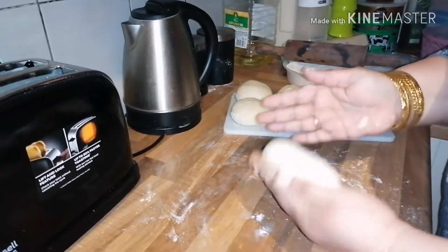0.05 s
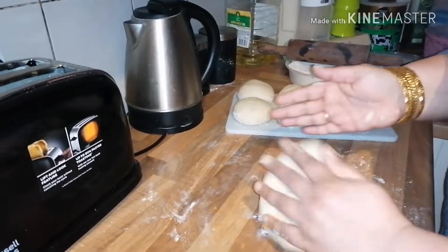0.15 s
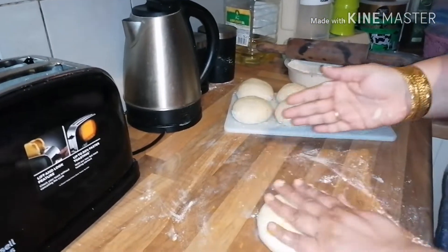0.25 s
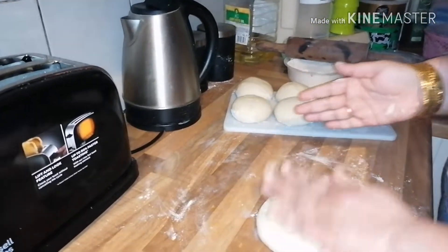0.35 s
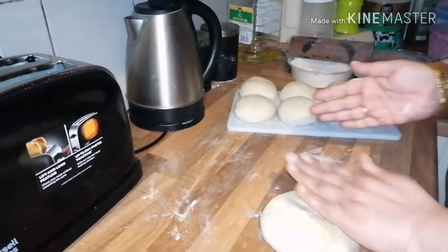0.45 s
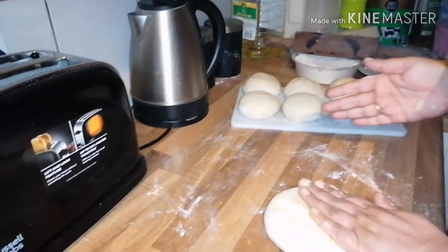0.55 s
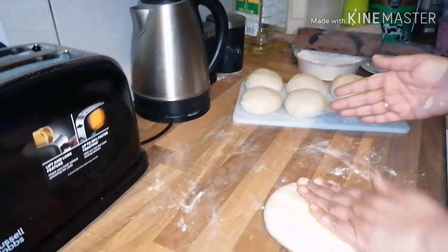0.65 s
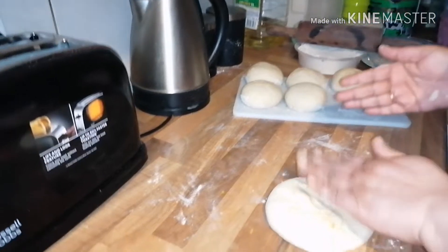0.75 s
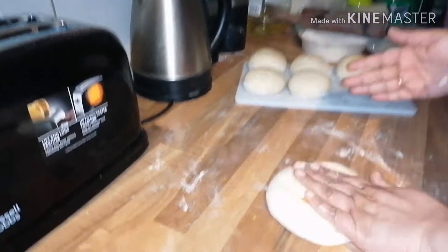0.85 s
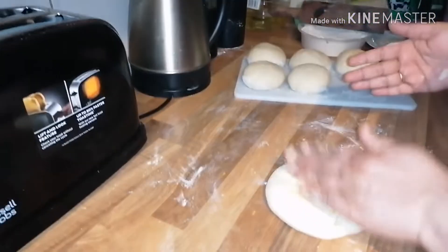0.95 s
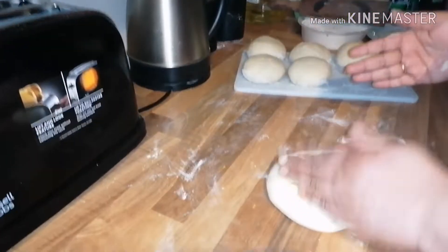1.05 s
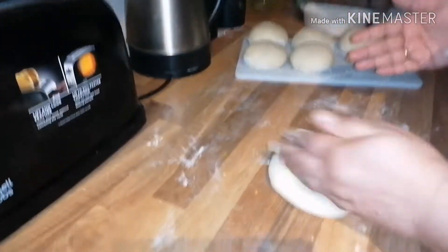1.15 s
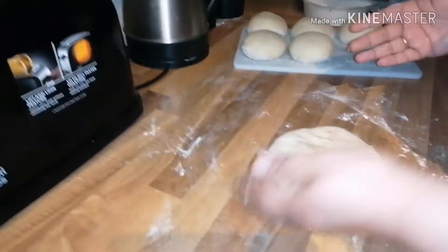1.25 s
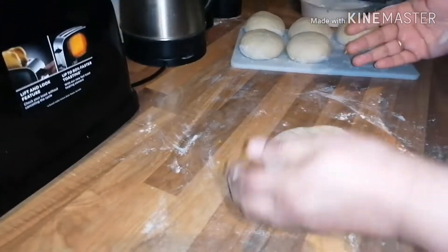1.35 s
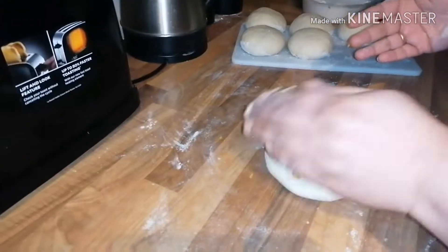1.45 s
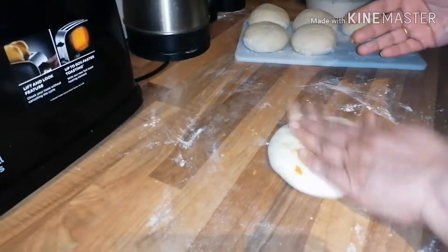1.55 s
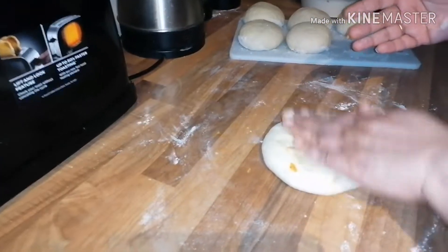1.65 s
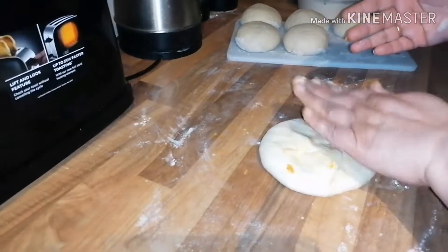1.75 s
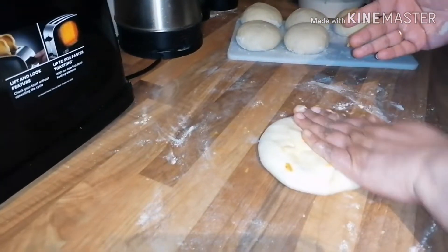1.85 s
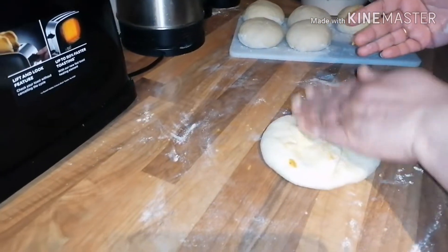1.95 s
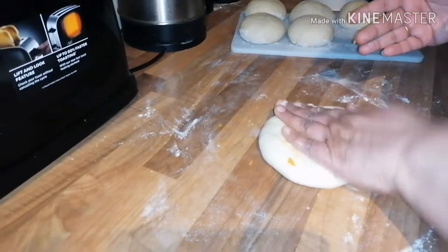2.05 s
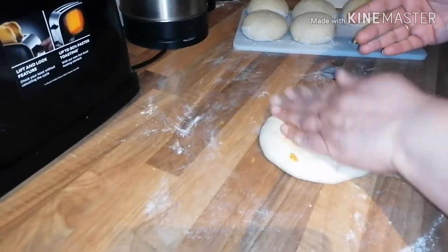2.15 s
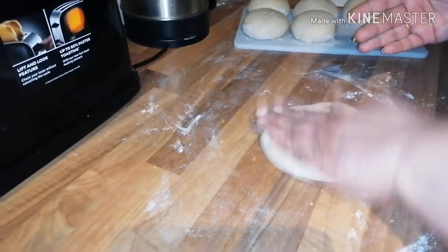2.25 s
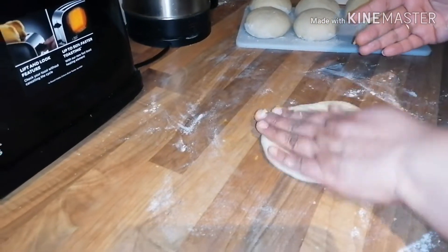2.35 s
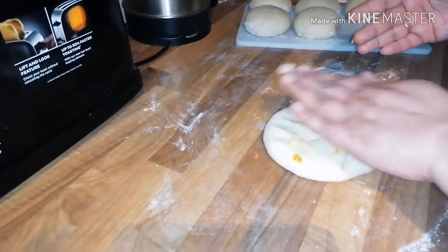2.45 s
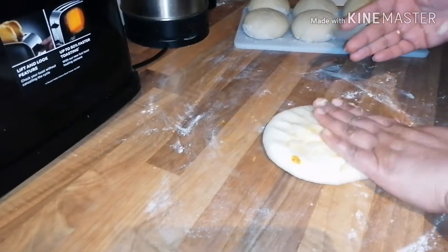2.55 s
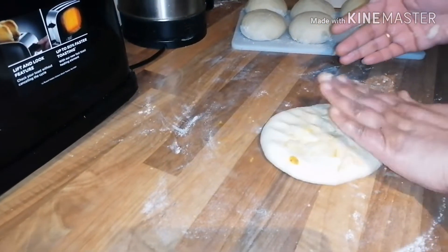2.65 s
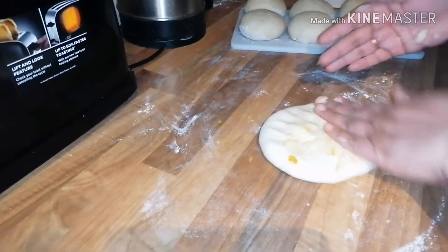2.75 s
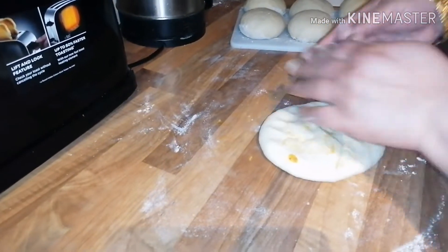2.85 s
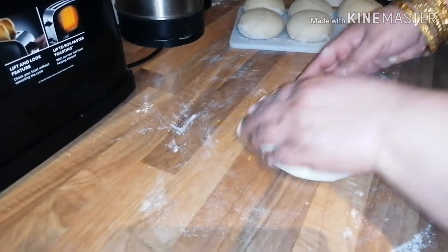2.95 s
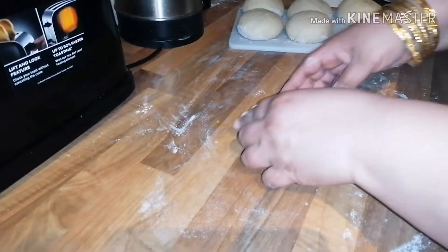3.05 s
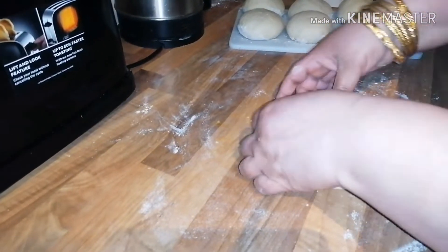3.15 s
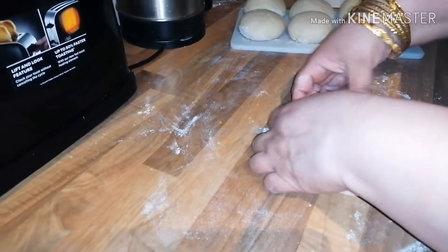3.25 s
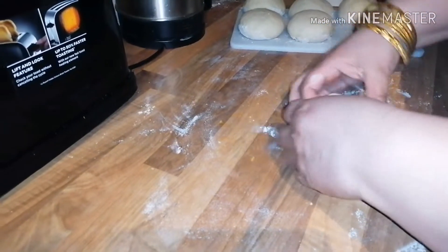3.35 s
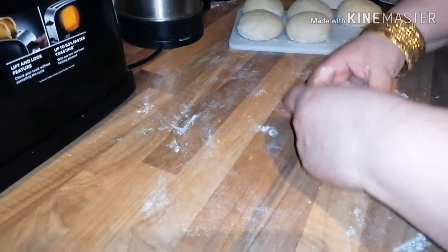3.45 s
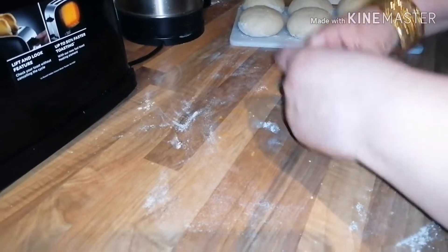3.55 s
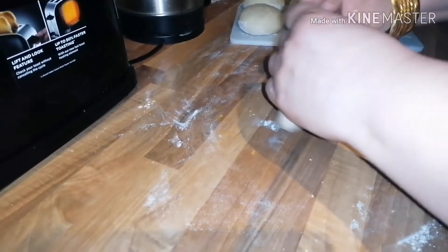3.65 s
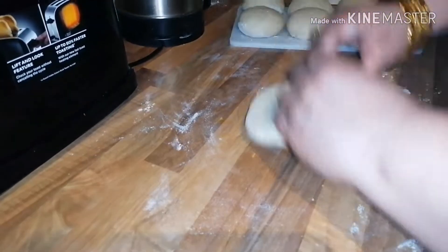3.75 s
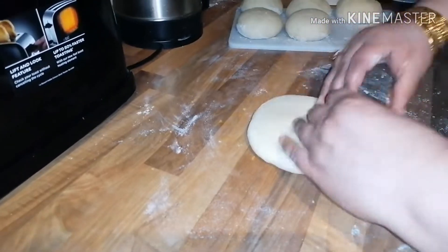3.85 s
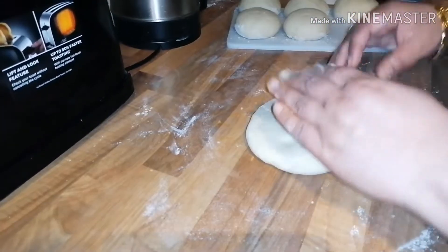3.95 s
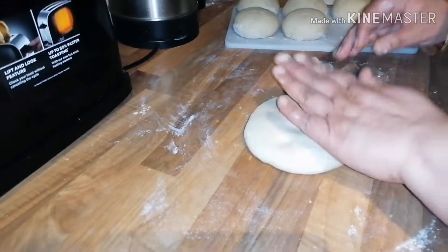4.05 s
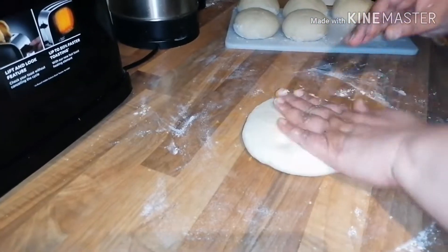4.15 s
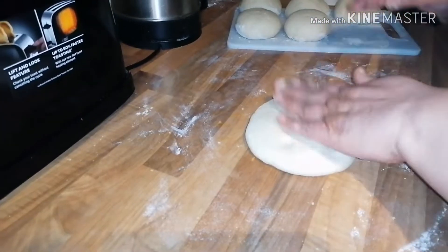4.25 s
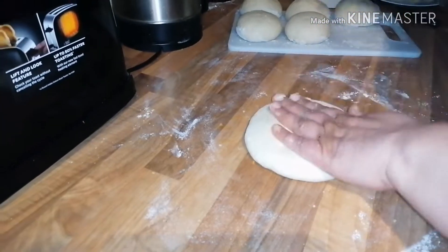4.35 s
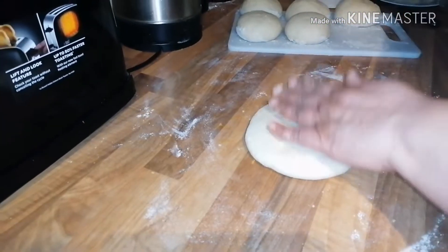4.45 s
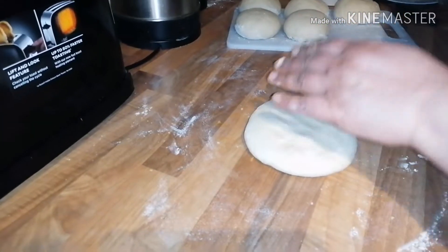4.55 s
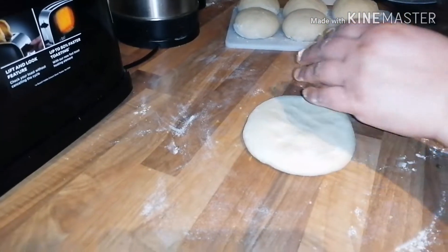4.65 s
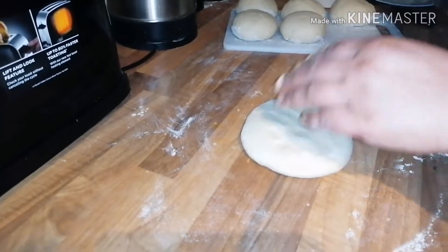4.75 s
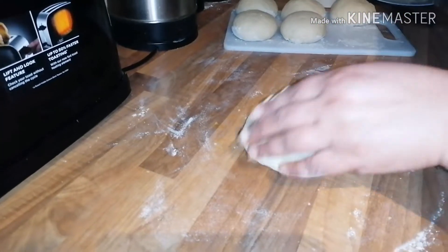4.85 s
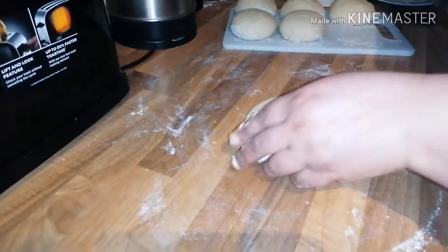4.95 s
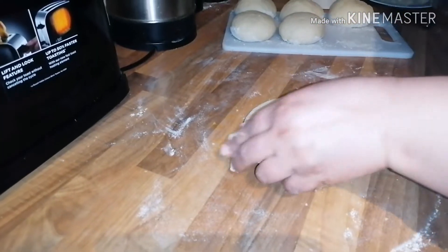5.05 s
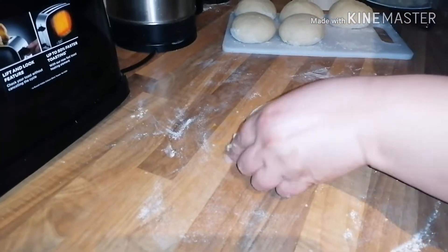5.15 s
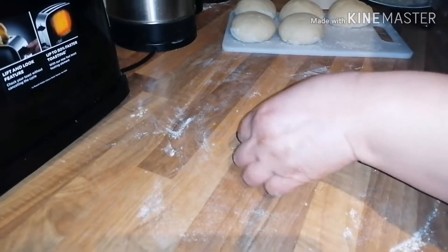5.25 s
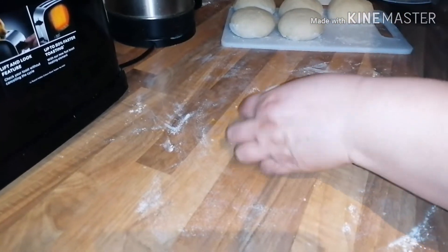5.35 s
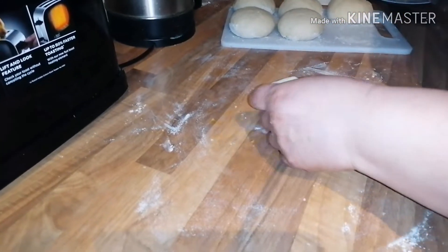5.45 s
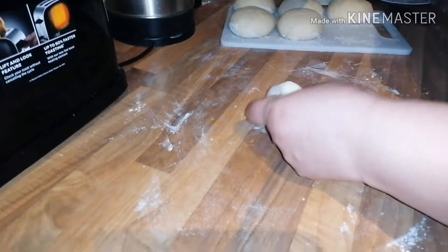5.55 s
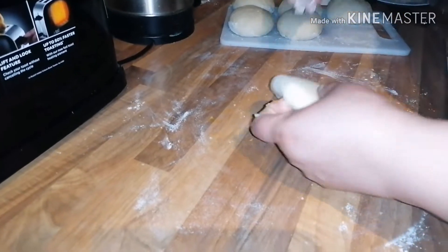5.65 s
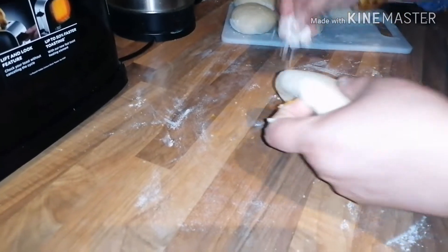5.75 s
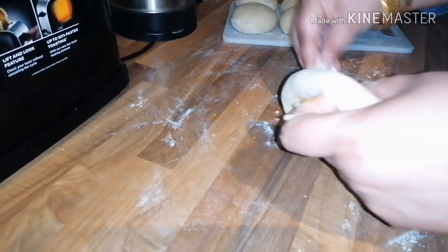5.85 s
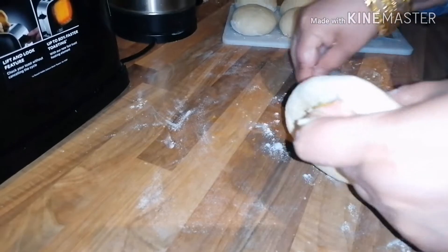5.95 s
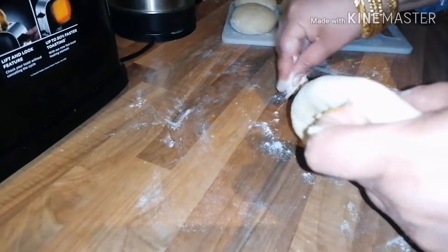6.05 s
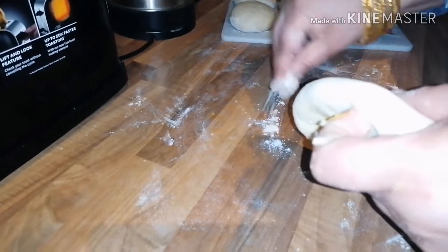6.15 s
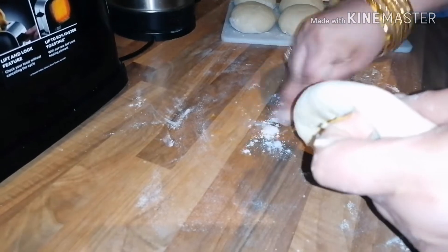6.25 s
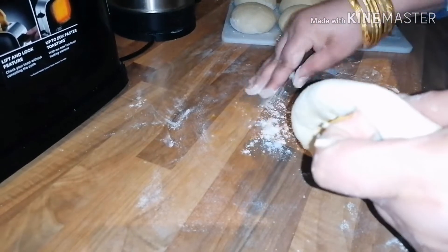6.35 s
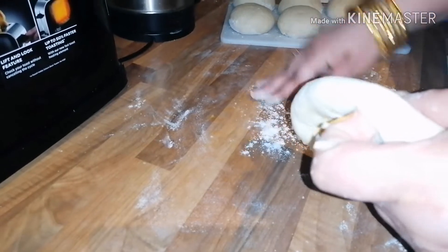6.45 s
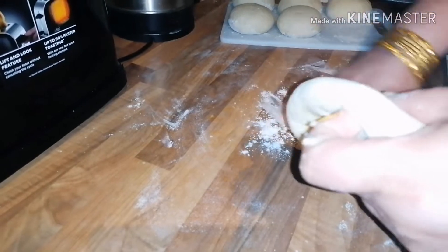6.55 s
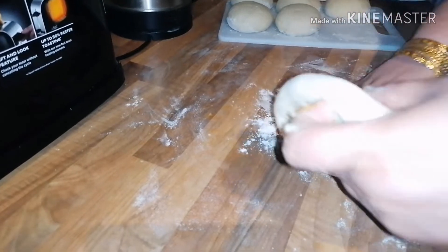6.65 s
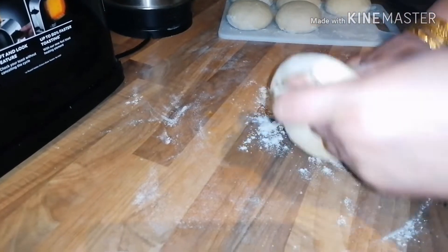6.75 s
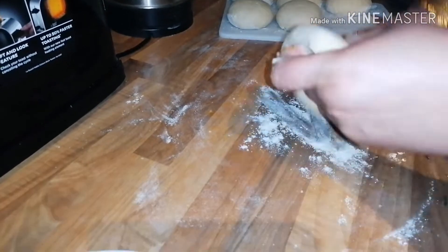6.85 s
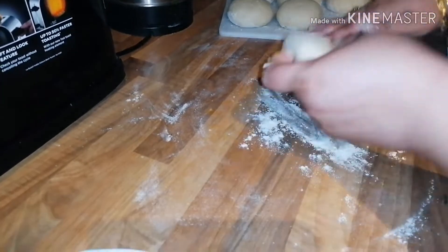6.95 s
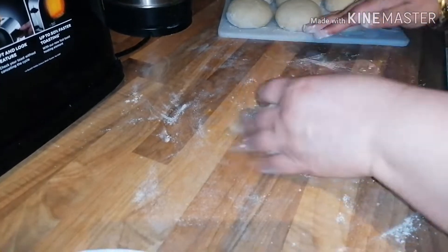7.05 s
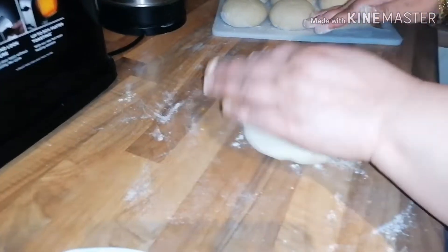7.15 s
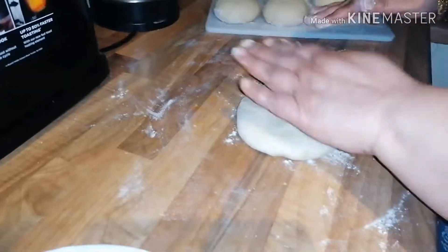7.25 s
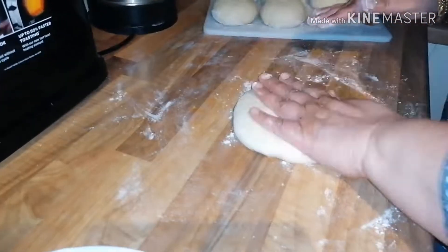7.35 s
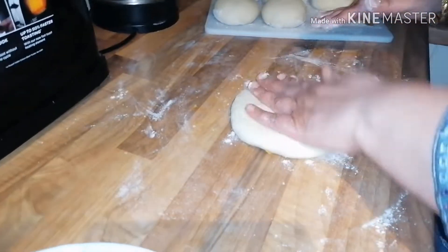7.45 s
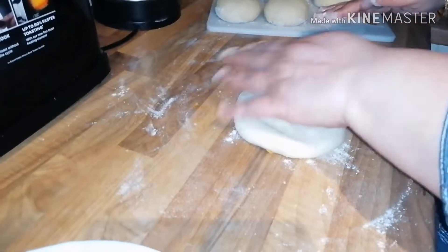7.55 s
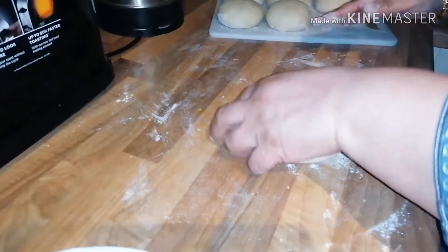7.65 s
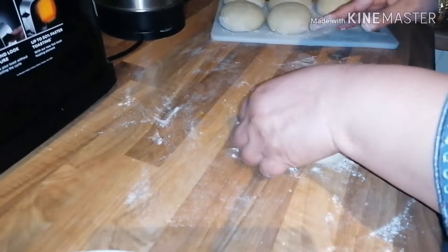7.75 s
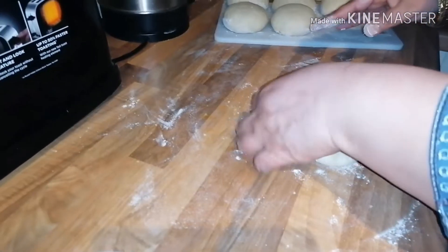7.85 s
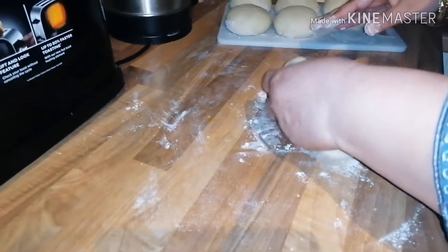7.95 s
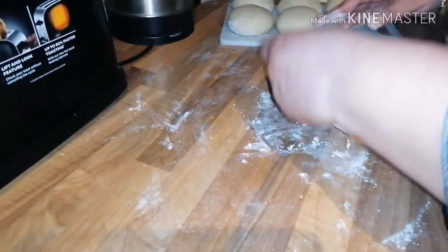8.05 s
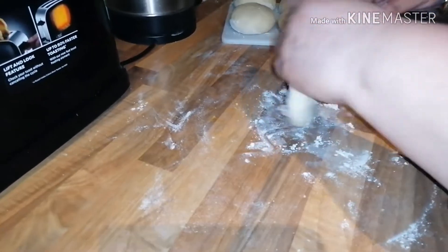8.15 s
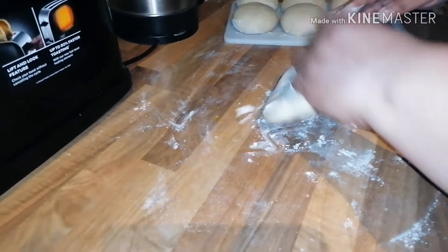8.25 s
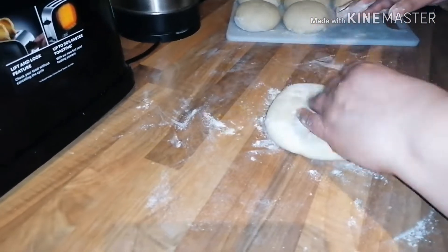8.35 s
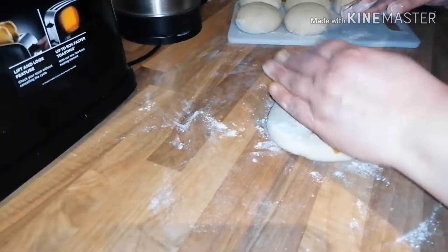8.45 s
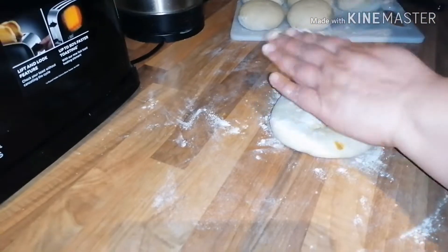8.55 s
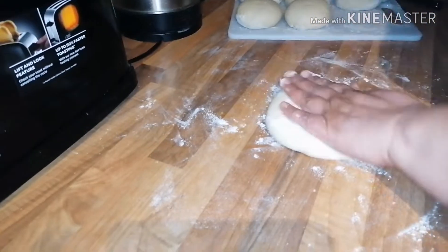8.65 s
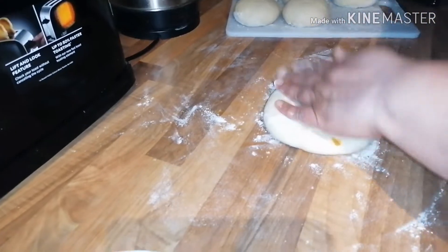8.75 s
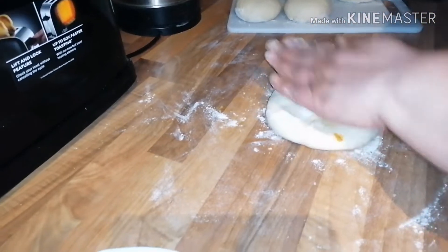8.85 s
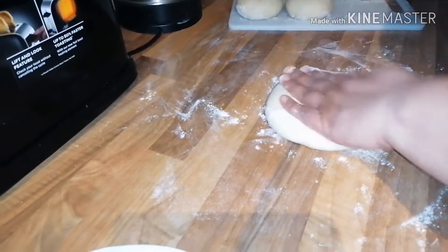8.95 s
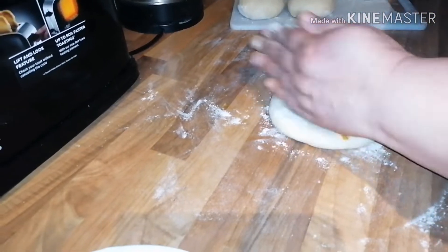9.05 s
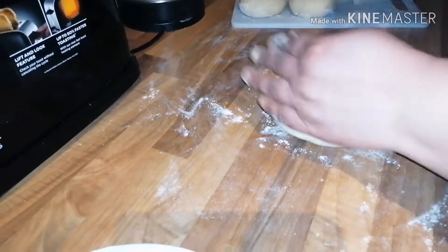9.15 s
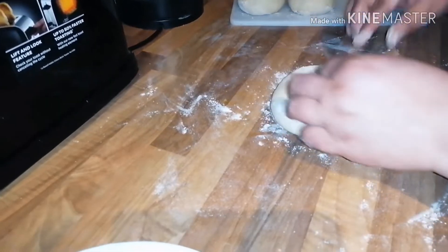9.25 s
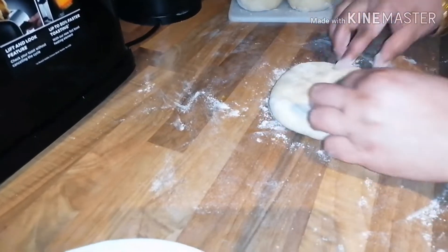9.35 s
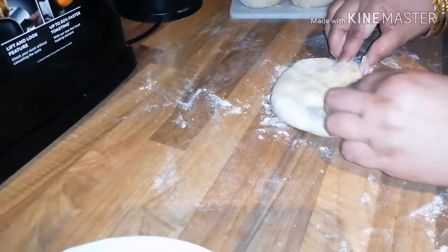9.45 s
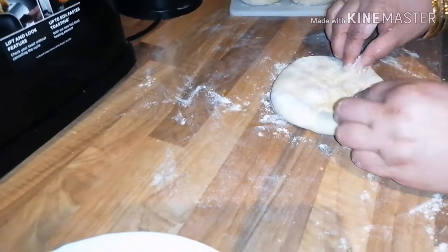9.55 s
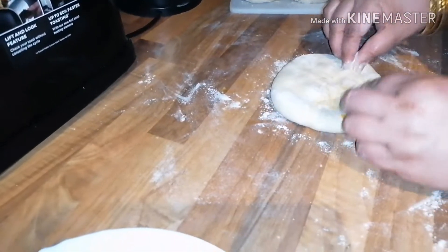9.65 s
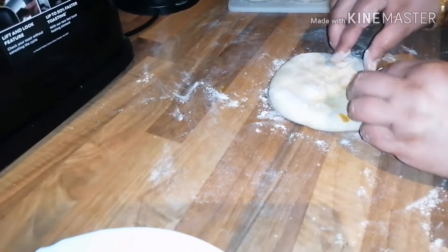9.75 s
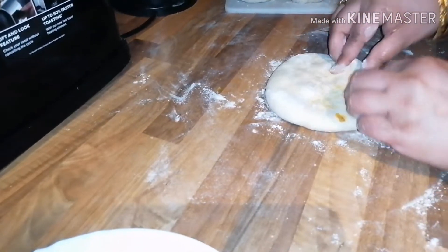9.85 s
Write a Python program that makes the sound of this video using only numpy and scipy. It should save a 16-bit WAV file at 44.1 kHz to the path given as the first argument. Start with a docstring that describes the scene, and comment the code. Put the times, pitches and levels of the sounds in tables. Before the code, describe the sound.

Close stereo sound in a small, quiet kitchen. A loud dough slap lands on a wooden worktop, followed by a run of softer pats. A pause brings floury sliding and a light bangle clink, then three more pats, quiet rubbing, another hard slap and a last group of firm pats.

```python
"""Hands on soft dough

A hand pats and presses soft dough on a wooden worktop in a small kitchen, heard from close by.
Each pat is a resonant pop of trapped air, a broadband smack of skin and a thud of decaying worktop modes.
Between pats, shaped noise makes fingers slide through flour, and thin bangles clink as decaying modes.
The hand holding the phone adds filtered rumble; noise with drifting patches is the kitchen air.
"""
import sys
import numpy as np
from scipy import signal
from scipy.fft import rfft, irfft
from scipy.io import wavfile
from scipy.ndimage import uniform_filter1d

SR = 44100
rng = np.random.default_rng(int(sys.argv[2]) if len(sys.argv) > 2 else 0)


def master_out(mix):
    """Clip the mix to full scale and print it as 16-bit PCM to the path in sys.argv[1]."""
    frames = np.transpose(np.atleast_2d(mix))
    ceiling = np.clip(frames, -1, 1)
    pcm = np.round(ceiling * 32767).astype(np.int16)
    wavfile.write(sys.argv[1], SR, pcm)


def boost_factor(decibels):
    """Convert a level in decibels to a linear amplitude factor."""
    exponent = np.asarray(decibels, float) / 20
    return 10 ** exponent


N = 436149  # length in samples


def evened(x):
    """Normalisation: scales a signal to rms 1."""
    return x / np.sqrt(np.mean(x ** 2) + 1e-20)


def read(points, hz):
    """Interpolation of a table on a logarithmic frequency axis."""
    f, value = np.transpose(points)
    return np.interp(np.log(hz + 1), np.log(f + 1), value)


def add(mix, s, sound):
    """Superposition: adds a sound to the mix from s seconds on."""
    part = mix[round(s * SR):][:len(sound)]
    part += sound[:len(part)]


def resonate(x, hz, width):
    """Resonance by heterodyning: shifts hz down to zero, smooths, and shifts back, with gain 1."""
    turn = np.exp(2j * np.pi * hz * np.arange(len(x)) / SR)
    r = np.exp(-np.pi * width / SR)
    smooth = signal.lfilter([1 - r], [1, -r], x / turn + 1e-18)
    return 2 * (turn * smooth).real


def coloured(x, spectrum):
    """Linear filtering in the frequency domain by a table of f/Hz, level/dB."""
    gain = boost_factor(read(spectrum, np.fft.rfftfreq(len(x), 1 / SR)))
    return irfft(rfft(x) * gain, len(x))


def ring(modes, scatter_db, rise_s, detune):
    """Modal synthesis: one blow excites damped sines, and chance varies each mode's share and pitch."""
    t = np.arange(SR // 3) / SR
    hz, db, t60 = np.transpose(modes)[:, :, None]
    share, shift = rng.standard_normal((2, *hz.shape))
    decay = boost_factor(db + scatter_db * share - 60 * t / t60)
    sines = np.sin(2 * np.pi * hz * (1 + detune * shift) * t)
    return (decay * sines).sum(0) * (1 - np.exp(-t / rise_s))


def correlated(left, other, same):
    """Interchannel coherence: mixes independent noises into a right channel of given likeness to the left."""
    return same * left + np.sqrt(1 - same ** 2) * other


def airy(spectrum, likeness, patchy_db):
    """Short-time spectral synthesis: two-channel noise of rms 1 with drifting patches in time and frequency."""
    hz = np.fft.rfftfreq(1024, 1 / SR)
    a, b, c, d, patches = rng.standard_normal((N // 256 + 5, 513, 5)).T
    patches = uniform_filter1d(patches, 12, axis=0)  # over frequency
    patches = evened(uniform_filter1d(patches, 10, axis=1))  # over time
    same = np.clip(read(likeness, hz), -1, 1)[:, None]
    left = a + 1j * b
    z = np.array([left, correlated(left, c + 1j * d, same)])
    z *= boost_factor(read(spectrum, hz)[:, None] + patchy_db * patches)
    return evened(signal.istft(z, nperseg=1024, noverlap=768)[1][:, :N])


# spectrum of the kitchen air: f/Hz, level/dB (relative density)
AIR_SPECTRUM = [(80, -18.5), (150, -12), (300, -11.5), (600, -12), (1300, -16.5), (2500, -20.5),
                (5000, -27), (9500, -32), (11500, -32.5), (13000, -39.5), (15500, -44.5)]
# left-right likeness of the kitchen air: f/Hz, correlation/1
AIR_LIKENESS = [(60, 1), (180, -2.9), (550, 0.11), (1650, -0.67), (4970, 0.3), (15000, -0.02)]


def kitchen_air():
    """Stationary diffuse noise: a quiet, patchy background of -70 dB rms."""
    return boost_factor(-70) * airy(AIR_SPECTRUM, AIR_LIKENESS, patchy_db=2.5)


# course of the deep handling rumble: t/s, level/dB (rms)
RUMBLE_COURSE = [(0, -68), (.8, -68), (0.961, -52), (1.15, -52.5), (1.32, -70.5), (2.3, -65.5),
                 (2.8, -73.5), (3.1, -63), (3.4, -68), (3.8, -73.5), (3.96, -61.5), (4.25, -60), (4.7, -67),
                 (5.4, -68), (5.75, -60.5), (5.95, -70), (7.2, -69.5), (7.502, -65), (8.799, -67),
                 (9.88, -70)]


def rumble():
    """Low-frequency excitation: the holding hand's deep noise, and worktop modes humming louder after a thud."""
    a, b, push = rng.standard_normal((3, N))
    grip = a + 0.35 * b, a - 0.35 * b  # left and right are alike but not equal
    depth = [(10, -6.5), (25, -6.5), (38, 7.5), (55, -11), (90, -30), (200, -66.5)]  # f/Hz, level/dB
    deep = evened(np.array([coloured(x, depth) for x in grip]))
    course = boost_factor(np.interp(np.arange(N) / SR, *np.transpose(RUMBLE_COURSE)))
    boom = evened(sum(boost_factor(db) * resonate(push, hz, 29) for hz, db, _ in WORKTOP_MODES[:3]))
    idle_db, shake_db = -72, -22  # steady hum; shake relative to the thud setting
    rise_s, t60_s = 0.05, 0.54
    t = np.arange(SR) / SR
    shake = np.full(N, boost_factor(idle_db))
    for s, _, thud_db, *_ in PAT_EVENTS + TOUCH_EVENTS:
        add(shake, s, boost_factor(thud_db + shake_db - 60 * t / t60_s) * (1 - np.exp(-t / rise_s)))
    return deep * course + boom * shake


# decay of the kitchen's echoes: f/Hz, t60/s
ROOM_DECAY = [(150, 0.45), (400, 0.097), (1000, 0.26), (2700, 0.22), (7000, 0.23), (12000, 0.25)]
# left-right likeness of the echoes: f/Hz, correlation/1
ROOM_LIKENESS = [(150, 0.97), (500, 0.41), (2000, 0.067), (10000, .05)]


def echoes():
    """Diffuse reverberation: a newly drawn noise tail, dying band by band, with energy 1 on the left."""
    hz, t, z = signal.stft(rng.standard_normal((2, SR // 3)), SR, nperseg=256)
    same = np.clip(read(ROOM_LIKENESS, hz), -1, 1)[:, None]
    z[1] = correlated(z[0], z[1], same)
    decay = boost_factor(-60 * t / read(ROOM_DECAY, hz)[:, None])
    tail = signal.istft(z * decay, SR, nperseg=256)[1]
    s = np.arange(tail.shape[1]) / SR
    onset = np.clip(s / 0.0026 - 0.3, 0, 1)
    tail *= onset * (1 + 2.1 * np.exp(-s / 0.0073))  # close tiles and worktop answer first and loudest
    return tail / np.linalg.norm(tail[0])


# fingers slide over flour and dough: t/s (start), length/s, level/dB (floury hiss), level/dB (dull drag)
RUB_STROKES = [(0.092, 0.27, -72.5, -77), (.72, 0.09, -77, -73), (0.963, 0.059, -74, -71),
               (1.093, 0.046, -67.5, -60.5), (1.18, 0.096, -76.5, -78), (2.145, 0.088, -74.5, -71),
               (2.936, 0.24, -75, -69.5), (3.096, 0.25, -66.5, -68), (3.3, 0.27, -65, -73),
               (3.515, 0.075, -67, -70), (3.74, 0.18, -62.5, -64), (4.48, 0.15, -72, -96),
               (5.099, 0.064, -80, -74), (5.214, 0.037, -72, -65), (5.401, 0.12, -68, -70),
               (5.495, 0.097, -71.5, -71), (5.571, 0.14, -73.5, -65), (6.056, 0.092, -72, -75),
               (6.208, 0.13, -69, -95), (6.317, 0.1, -69, -86), (6.528, 0.22, -58.5, -72),
               (6.702, 0.18, -62.5, -67.5), (7.46, 0.17, -75, -68.5), (7.689, 0.096, -66, -67.5),
               (7.764, 0.18, -68.5, -70.5), (7.923, 0.035, -60.5, -76), (7.945, 0.077, -62.5, -65),
               (8.24, 0.23, -70, -79), (9.052, 0.15, -77.5, -71), (9.708, 0.058, -73.5, -83)]
# spectrum of flour grains: f/Hz, level/dB (relative density)
HISS_SPECTRUM = [(700, -36.5), (1200, -12), (2000, -0.5), (3500, -2.5), (7000, -1.5), (9500, -0.5),
                 (11500, -9), (13000, -13.5), (15500, -31)]
# spectrum of dragged dough: f/Hz, level/dB (relative density)
DRAG_SPECTRUM = [(120, -48), (200, -45), (217, -3), (333, -11.5), (518, -14.5), (594, -2.5), (1010, -10),
                 (1610, -13.5), (3000, -14), (3900, -16), (6600, -120)]


def rubs():
    """Friction noise: flour grains hiss, dragged dough is duller, and each stroke swells and fades."""
    near = [(100, 0.97), (15000, 0.08)]  # f/Hz, left-right correlation
    grit = boost_factor(2.6 * np.minimum(rng.exponential(1, N), 5))  # uneven grains
    hiss = airy(HISS_SPECTRUM, near, patchy_db=0.7) * evened(uniform_filter1d(grit, 40))
    drag = airy(DRAG_SPECTRUM, near, patchy_db=1.3)
    # the palm peels off the dough 0.06 s after each pat, for 0.066 s
    peels = [(row[0] + 0.06, 0.066, -78.5, -69.5) for row in PAT_EVENTS]
    lean, sharpness = 0.76, 1.05  # a lean under 1 peaks early
    strokes = np.zeros((N, 2))
    for start, length, hiss_db, drag_db in RUB_STROKES + peels:
        course = np.linspace(0, 1, round(length * SR)) ** lean
        arch = np.sin(np.pi * course).clip(0) ** sharpness
        add(strokes, start, np.outer(arch, boost_factor([hiss_db, drag_db])))
    wander = uniform_filter1d(uniform_filter1d(rng.standard_normal(N), 600), 600)
    flutter = boost_factor(2 * evened(wander))  # 2 dB rms of unevenness
    return flutter * (hiss * strokes[:, 0] + drag * strokes[:, 1])


# bangles touch: t/s, level/dB (before a common cut of 10.5 dB)
CLINK_EVENTS = [(0.1635, -57), (3.32, -50), (3.3894, -65), (3.7075, -67), (4.4275, -63), (4.5007, -64),
                (4.5413, -58), (4.6558, -61.5), (5.3862, -61.5), (6.166, -65), (6.3469, -57), (9.7313, -64)]
# modes of a thin metal hoop: f/Hz, level/dB, t60/s
BANGLE_MODES = [(5800, -7, 0.085), (7500, -2.5, 0.038), (10000, 5.5, .045), (10600, -11, .03),
                (11900, -9, 0.032), (12700, -11.5, .04), (14400, -8.5, .06)]


def bangles():
    """Modal impact: each touch is a noisy tick and the short ring of three thin metal hoops."""
    out = np.zeros((N, 2))
    t = np.arange(SR // 3) / SR
    for s, db in CLINK_EVENTS:
        tick = np.diff(rng.standard_normal(len(t) + 2), 2) * np.exp(-t / 0.005)
        hoops = sum(ring(BANGLE_MODES, scatter_db=2.5, rise_s=0.0004, detune=0.02) for _ in range(3))
        clink = boost_factor(db - 10.5) * (hoops + 1.1 * tick)
        room = signal.fftconvolve(clink[None], echoes(), axes=1)[:, :len(t)]
        add(out, s, (clink + boost_factor(-6.5) * room).T)
    return out.T


# filter of the skin smack: f/Hz, level/dB
SMACK_FILTER = [(600, -24), (900, -5.5), (1300, 1.5), (2000, 2.5), (4000, -8), (7000, -12), (11000, -20.5),
                (13000, -38.5), (15500, -52.5)]


def slap(pocket_db, crisp_db, pocket_hz, smack_hz, snap_db):
    """Cavity resonance and broadband impact: the palm pops its air pocket and smacks; returns pocket, both."""
    click = np.eye(1, 2048, 128)[0]  # unit impulse at sample 128
    pocket = resonate(resonate(click, pocket_hz, 250), pocket_hz, 2000)
    pocket *= boost_factor(pocket_db) / abs(pocket).max()
    smack = coloured(click + 2.8 * resonate(click, smack_hz, 600), SMACK_FILTER)
    smack = coloured(smack, [(3500, 0), (7000, snap_db)])
    pulse = pocket + boost_factor(crisp_db + 16.5) * smack / abs(smack).max()
    flat_db = 10.5 + 0.35 * pocket_db  # a harder slap lands flatter: more near 1.3 kHz
    return pocket, coloured(pulse, [(850, 0), (1350, flat_db), (2300, 0.00063)])


def finger_contacts():
    """Impulse train: sparse finger contacts grow towards the palm at sample 250, then die; energy is 1."""
    ms = (np.arange(500) - 250) / SR * 1000
    spread = np.exp(np.where(ms < 0, ms / 1.5, -ms / 2.5))
    touch = rng.random(len(ms)) < 0.12
    size = rng.standard_normal(len(ms))
    contacts = 0.53 * touch * size * spread + (ms == 0)
    return contacts / np.linalg.norm(contacts)


# worktop and cupboard under it; the first five modes answer the thud, the rest the slap: f/Hz, level/dB, t60/s
# (in a thud, the third mode's level is raised further by the finger snap)
WORKTOP_MODES = [(82.2, -4, 0.23), (104.7, -1, 0.4), (168.2, -4, 0.24), (97.7, -8, .25), (240, -14.5, 0.17),
                 (298, -3.5, 0.36), (359.4, -3.5, 0.31), (414, -7.5, 0.22), (486.5, -2, 0.18),
                 (583, -2.5, 0.23), (696, -4.5, 0.053), (845, -8.5, .15), (1225, 11.5, 0.055)]


def pat(pocket_db, thud_db, crisp_db, pocket_hz, smack_hz, snap_db):
    """Impact response: contacts, slap and thud excite the modes of the worktop and the echoes of the room."""
    pocket, pulse = slap(pocket_db, crisp_db, pocket_hz, smack_hz, snap_db)
    modes = np.array(WORKTOP_MODES)
    modes[2, 1] += 4.5 + 0.78 * snap_db  # dB, louder under snappier fingers
    thud = boost_factor(thud_db) * ring(modes[:5], scatter_db=2.55, rise_s=0.0052, detune=0.025)
    # the low ring keeps its own decay for 0.1 s, then drops a further 8.5 dB within 4.5 ms
    thud *= boost_factor(np.interp(np.arange(len(thud)) / SR - 0.1, [0, 0.0045], [0, -8.5]))
    # close pairs of modes beat against each other
    pairs = sum(ring(modes[5:], scatter_db=1.5, rise_s=0.002, detune=0.02) for _ in range(2))
    knock = boost_factor(-53) * signal.fftconvolve(pocket, pairs)[:len(thud), None]
    room = signal.fftconvolve(pulse[None], echoes(), axes=1)
    out = np.zeros((len(thud) + 378, 2))  # the palm lands at sample 378 = 250 + 128
    add(out, 0, np.convolve(pulse, finger_contacts())[:, None])
    add(out, 250 / SR, room.T)
    add(out, 250 / SR, knock)
    add(out, 378 / SR, thud[:, None])
    return signal.lfilter(*signal.butter(3, 68, "high", fs=SR), out.T)


# soft knocks of fingers and knuckles: t/s, level/dB (air pocket), level/dB (thud), f/Hz (air pocket)
TOUCH_EVENTS = [(0.734, -61, -64, 576), (0.777, -52.5, -53.5, 583), (0.812, -55, -49, 298),
                (1.101, -49.5, -61.5, 590), (3.174, -70, -49.5, 649), (3.267, -51, -55.5, 600),
                (3.609, -50, -67, 305), (3.711, -51, -74, 870), (3.752, -51, -53, 500),
                (5.237, -45, -82, 1530), (5.45, -62, -84, 590), (7.436, -39, -46, 400),
                (7.463, -48, -65, 307), (7.524, -47, -53, 353), (7.594, -47.5, -62, 294),
                (7.691, -49, -49.5, 312), (7.928, -57, -60.5, 700), (7.971, -46, -69.5, 670),
                (8.009, -54, -85.5, 1200), (8.317, -32, -57, 654)]
# palm or dough lands: t/s, level/dB (air pocket), level/dB (thud), level/dB (smack, before a 16.5 dB lift),
# f/Hz (air pocket), f/Hz (smack centre), level/dB (finger snap: tilt of the smack from 3.5 to 7 kHz)
PAT_EVENTS = [(0.259, -11, -31.5, -22.5, 643, 3320, 0), (0.551, -32.5, -36, -43.5, 314, 3530, -5),
              (0.871, -30, -43, -40.5, 390, 2190, 3.5), (1.319, -28, -48, -49, 605, 1620, 4.5),
              (1.615, -29.5, -42.5, -38, 579, 3140, -1.5), (1.82, -19, -31.5, -31.5, 433, 3740, 5),
              (2.069, -30, -44, -40.5, 692, 3240, 0.5), (2.288, -29, -38.5, -39, 536, 3160, -4),
              (2.552, -24.5, -29.5, -34.5, 336, 4700, 0.5), (2.72, -19.5, -31, -32.5, 440, 3670, 7.5),
              (3.825, -20, -30.5, -35, 720, 1570, 2), (4.146, -20, -31, -31, 400, 2550, 3.5),
              (4.367, -25.5, -31.5, -37, 574, 2730, -1.5), (7.084, -10, -26.5, -26.5, 565, 3140, 0),
              (7.377, -30.5, -34.5, -37.5, 565, 3620, -1.5), (8.329, -17, -49, -25.5, 530, 2730, 2),
              (8.335, -16, -33.5, -32, 500, 2385, -16.5), (8.65, -25, -25, -28.5, 828, 4970, -2),
              (8.916, -17, -28, -31, 438, 2880, -2)]


def pats():
    """Superposition of impacts: firm pats, and soft knocks made dull by a weak smack."""
    touches = [(s, db, thud_db, db - 21.5, hz, 2660, 0) for s, db, thud_db, hz in TOUCH_EVENTS]
    out = np.zeros((N, 2))
    for s, *row in PAT_EVENTS + touches:
        add(out, s - 378 / SR, pat(*row).T)
    return out.T


def scene():
    """Linear superposition: kitchen air, rumble, rubs, bangles and pats."""
    return kitchen_air() + rumble() + rubs() + bangles() + pats()


def top_cut(x):
    """Nothing passes above the cut-off."""
    return signal.sosfilt(signal.butter(12, 15980, fs=SR, output="sos"), x)


# phase lead of the left microphone port over the right: f/Hz, phase/rad
PORT_LEAD = [(0, 0.67), (500, -0.61), (1500, -0.94), (2200, -1.7), (4000, -0.48), (8000, -1.6), (15000, 1)]
# level of the left port minus the right: f/Hz, level/dB
PORT_LEAN = [(60, -4), (130, 2), (290, -4), (640, -1.5), (1410, -0.5), (3100, -1.5), (6820, 3.5),
             (15000, -6)]


def record(dry):
    """Interchannel phase and level differences: two ports hear by frequency, and the top is cut."""
    hz = np.fft.rfftfreq(N, 1 / SR)
    half = boost_factor(read(PORT_LEAN, hz) / 2) * np.exp(0.5j * read(PORT_LEAD, hz))  # half to each side
    top = boost_factor(read([(14900, 0), (15300, -25), (16000, -60)], hz))
    ports = irfft(rfft(dry) * [half, 1 / half] * top, N)
    return top_cut(ports)


dry = scene()
out = record(dry)
master_out(out)
```